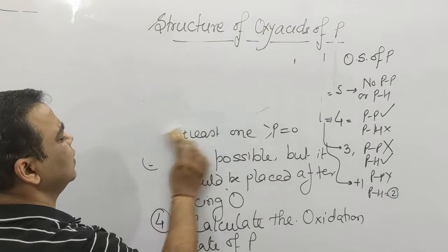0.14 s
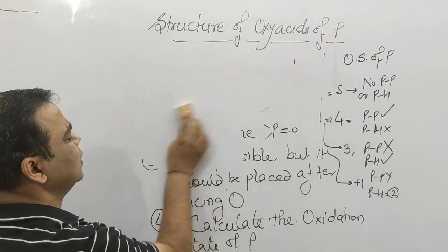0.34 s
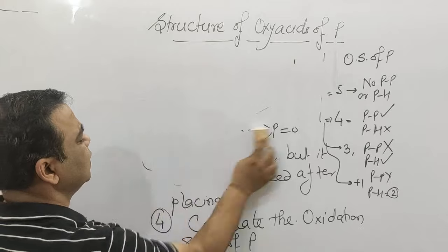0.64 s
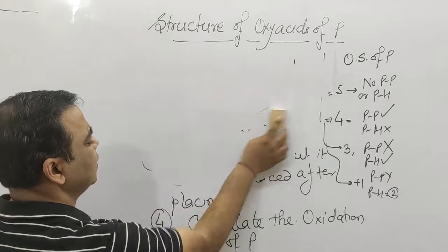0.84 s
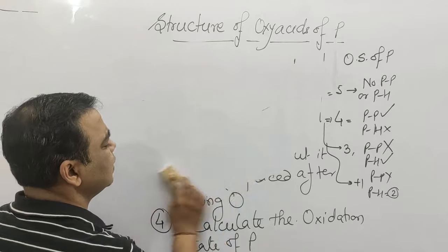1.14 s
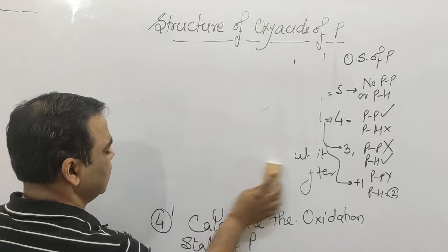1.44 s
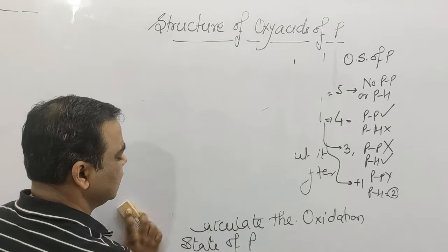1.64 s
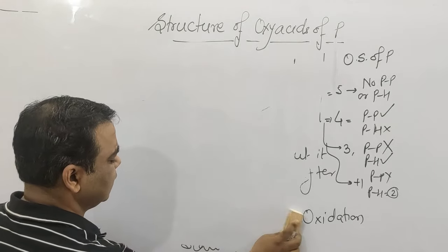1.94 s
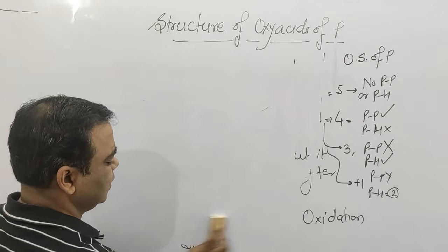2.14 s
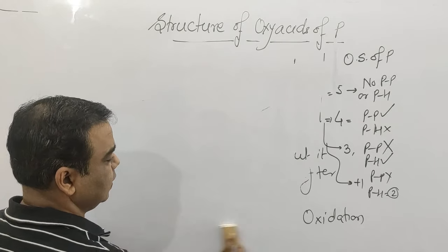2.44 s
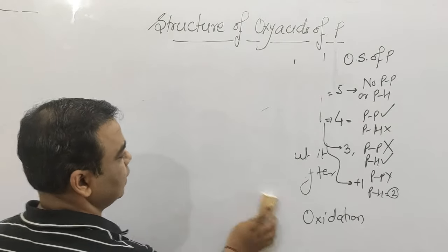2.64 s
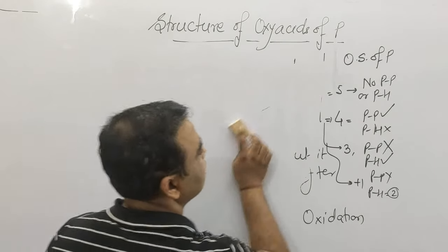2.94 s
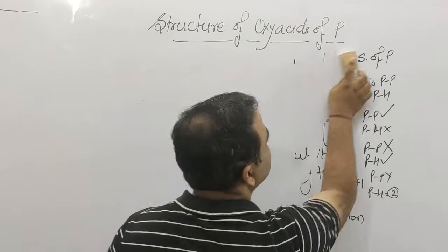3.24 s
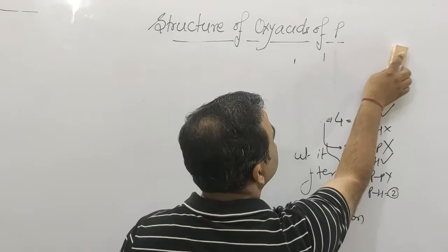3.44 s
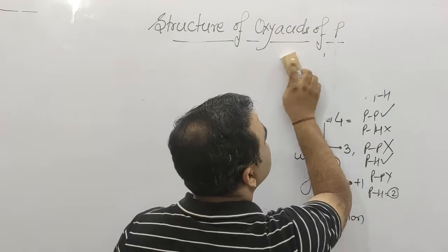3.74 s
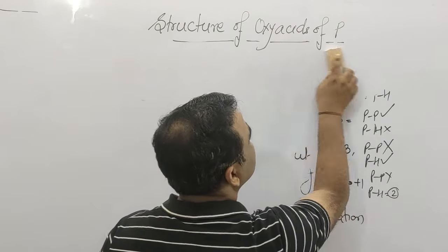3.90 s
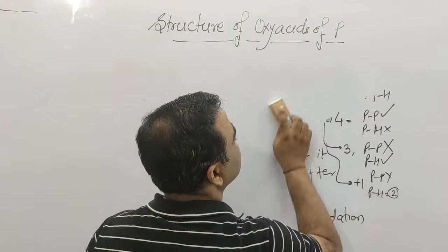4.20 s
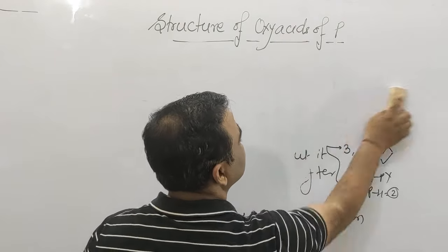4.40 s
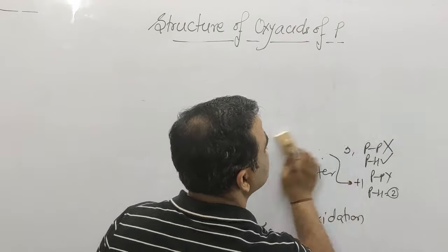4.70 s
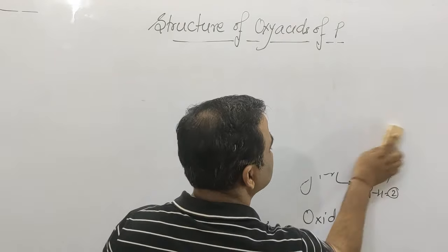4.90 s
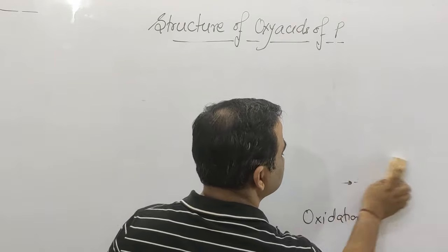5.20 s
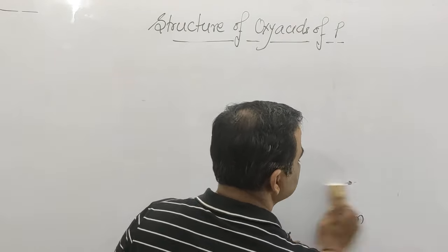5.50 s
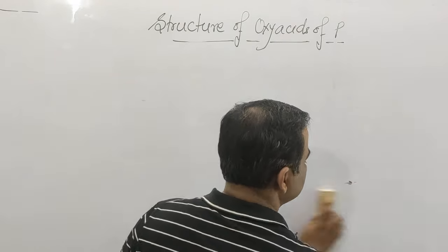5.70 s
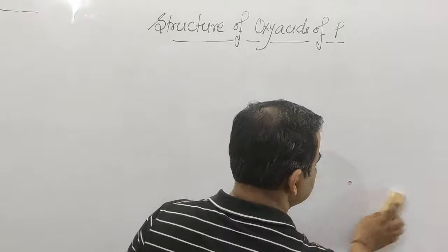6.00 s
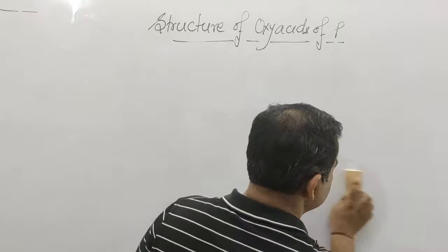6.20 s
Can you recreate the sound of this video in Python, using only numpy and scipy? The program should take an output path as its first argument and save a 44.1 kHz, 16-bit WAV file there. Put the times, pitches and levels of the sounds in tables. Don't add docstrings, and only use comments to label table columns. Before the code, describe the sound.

A felt duster swishes back and forth on a large whiteboard, the loose panel knocking hollowly and rumbling over a low fan hum.

```python
import sys
import numpy as np
from scipy import signal
from scipy.fft import rfft, irfft
from scipy.io import wavfile

SR = 44100
rng = np.random.default_rng(int(sys.argv[2]) if len(sys.argv) > 2 else 0)


def pcm_store(signal):
    levels = np.round(np.clip(np.atleast_2d(signal), -1, 1) * 32767)
    wavfile.write(sys.argv[1], SR, levels.astype(np.int16).T)


def invert_db(x):
    u = np.asarray(x, float) / 20
    return 10 ** u


N = 280035

# start in seconds, rap in dB, hollow ring in dB, crack against the rap in dB,
# hollow note in Hz.
KNOCKS = [(0.09, -41.5, -37.5, -5, 340), (0.2957, -26.5, -26.5, -25, 285), (0.438, -35, -35, -30, 287),
          (0.4963, -34.5, -30.5, -27, 280), (0.559, -35, -24.5, -31, 287.3), (0.602, -27, -40, -20, 245),
          (0.711, -24, -29, -21, 329), (1.169, -32, -26.5, -3.5, 295), (1.188, -36, -27, -20, 277.5),
          (1.2582, -23, -36, -16, 350), (1.757, -37, -26.5, -16, 281), (1.882, -41, -27, -18, 309),
          (1.935, -26.5, -28, -26, 294), (2.2002, -36, -36, -2.5, 283), (2.248, -23.5, -26, -6.5, 244),
          (2.291, -22, -24.5, -15.5, 237), (2.4285, -31, -24, -7.5, 274), (2.536, -25, -28, -16, 298),
          (2.855, -44.5, -50, -9, 228), (2.953, -44, -38.5, -11, 256), (3.159, -45, -38.5, -3, 245),
          (4.776, -39, -58, -22, 291), (5.6246, -38, -32.5, -12, 342), (6.236, -47, -46, -6, 317),
          (1.1738, -45, -33, 0, 304), (2.2542, -30, -34, -3, 206), (2.574, -46, -33, -15, 340)]
# start in seconds, thump in dB,
# hollow ring in dB, hollow note in Hz.
BUMPS = [(0.16, -20, -35.5, 284), (1.171, -23.5, -34, 280), (0.69, -42, -43, 230), (1.14, -40, -35.5, 220),
         (1.388, -34, -43, 322), (1.453, -51, -37.5, 305), (4.307, -40, -39, 224), (4.599, -37.5, -39, 294),
         (4.54, -32.5, -45, 276), (5.469, -33, -35, 256), (5.928, -43, -39.5, 250), (6.263, -35, -41, 219),
         (1.712, -46, -30.5, 270), (4.974, -37, -33, 266), (5.176, -55, -35.5, 320),
         (5.349, -33, -34.5, 364), (5.712, -19.5, -33.5, 343), (5.991, -52, -39.5, 380),
         (6.072, -29, -36.5, 306), (5.635, -45, -28.5, 248), (5.11, -36, -38, 280), (5.745, -44, -38, 370),
         (1.49, -32.5, -48, 305), (2.32, -27, -30, 240), (2.7, -46, -33, 300), (1.275, -32, -31.5, 370),
         (1.3, -37, -34, 280), (.76, -35, -35.5, 370)]
# pitch in Hz, level in dB, t60 in seconds.
DULL_MODES = [(374, 1, 0.023), (545, 4.5, 0.016), (655, -3.5, 0.028), (820, -4, 0.024)]


def rms_one(x):
    return x / np.sqrt(np.mean(x ** 2) + 1e-20)


def in_time(rows):
    s, *columns = np.transpose(rows)
    return [np.interp(np.arange(N) / SR, s, c) for c in columns]


def band(x, low_hz, high_hz):
    edges_hz = [low_hz, min(high_hz, SR / 2.2)]
    return signal.sosfilt(signal.butter(2, edges_hz, "band", fs=SR, output="sos"), x)


def coloured(x, spectrum):
    hz, level_db = np.transpose(spectrum)
    log_hz = np.log(np.arange(1, N // 2 + 2) * SR / N)
    return rms_one(irfft(rfft(x) * invert_db(np.interp(log_hz, np.log(hz), level_db)), N))


def drift(rate):
    r = np.exp(-80 * np.pi * rate / SR)
    slow = signal.lfilter([1], [1, -2 * r, r * r], rng.standard_normal(N // 40 + 2002))[2000:]
    return np.interp(np.arange(N) / 40, np.arange(len(slow)), rms_one(slow))


def resonant_noise(hz, width_hz):
    r = np.exp(-np.pi * width_hz / SR)
    section = [1, 0, -1, 1, -2 * r * np.cos(2 * np.pi * hz / SR), r * r]
    return rms_one(signal.sosfilt([section, section], rng.standard_normal(N)))


def swell(s, length):
    return np.exp(-(2 * (np.arange(N) / SR - s) / length) ** 2)


def ring(force, hz, t60):
    r, w = invert_db(-60 / (t60 * SR)), 2 * np.pi * hz / SR
    return signal.lfilter([0, np.sin(w)], [1, -2 * r * np.cos(w), r * r], force + 1e-18)


def fan():
    # frequency in Hz, level in dB per Hz.
    air_colour = [(18, -37), (36, 5), (66, -14), (152, -12), (198, -41), (278, -25), (494, -24), (535, -23),
                  (1030, -39.5), (1270, -39), (1880, -53.5), (2930, -41), (15700, -104)]
    # pitch in Hz, level in dB.
    motor_lines = [(89.4, -46.5), (162.5, -47.5), (146, -55)]
    t = np.arange(N) / SR
    air = invert_db(-43.5) * coloured(rng.standard_normal(N), air_colour)
    motor = sum(invert_db(db + 1.5 + 0.6 * drift(0.56)) * np.sin(2 * np.pi * hz * t) for hz, db in motor_lines)
    blades = invert_db(-54.5) * resonant_noise(42.3, 2.05)
    return air + motor + blades


def stroke_shape():
    # turn in seconds, sink of the hiss at the turn in dB,
    # hiss in mid-stroke in dB, fine hiss against it in dB.
    strokes = [(-.05, -13, -58.5, -5.5), (.16, -0.5, -56.5, -9), (.24, 0.5, -51, -5),
               (.345, 9, -60.5, -4.5), (.6, -1.5, -56.5, -8.5), (.88, 3, -65, -0.5), (.99, 0.5, -57, -6),
               (1.149, 0.5, -54, -9), (1.46, 10, -59, -3.5), (1.767, -2.5, -53.5, -13),
               (2.1, 7.5, -61.5, -4), (2.399, -0.5, -57.5, -12), (2.72, 2, -63.5, -5),
               (2.89, 2.5, -56.5, -9), (3.12, -1.5, -60, -3.5), (3.51, 2.5, -61, -5.5),
               (3.86, 5, -61.5, -7.5), (4.09, 4.5, -62.5, -3.5), (4.34, 1.5, -56.5, -4.5),
               (4.56, 5, -56.5, -10), (4.79, 2.5, -56.5, -6), (4.98, 7, -58, -7.5), (5.18, -0.5, -52, -9),
               (5.355, 9, -55.5, -9), (5.54, 1, -52, -10.5), (5.715, 8.5, -55.5, -8.5),
               (5.89, 0.5, -55, -10), (6.075, 6.5, -55, -1.5), (6.28, -0.5, -59, -8), (6.45, 0, -59, -2)]
    t = np.arange(N) / SR
    turn, sink_db, full_db, fine_db = np.transpose(strokes)
    middle = (turn[1:] + turn[:-1]) / 2
    speed = np.abs(np.sin(np.pi * np.interp(t, turn, np.arange(len(turn)))))
    turn_sharpness = 0.82
    loss_db = np.interp(t, turn, sink_db) * (1 - speed) ** turn_sharpness
    return np.interp(t, middle, full_db[:-1]), np.interp(t, middle, fine_db[:-1]), loss_db


def felt():
    # frequency in Hz, level in dB per Hz.
    rub_colour = [(900, 18), (1500, 18), (3000, 14), (5600, 10), (8000, 7.5), (12000, 9), (14500, 10.5),
                  (15900, 23.5)]
    # time in seconds, a level in dB that stays silent here,
    # thinnest air of the hiss against the fine hiss in dB.
    tilt = [(0.0, -61, -10), (0.23, -62, -9), (0.3, -56, -9), (0.35, -63, -8), (0.72, -62, -7),
            (0.88, -69, -9), (1.06, -58, -13), (1.38, -58, -8), (1.47, -62, -2), (1.61, -70, -3),
            (2.88, -68, -43), (3.15, -62, 1), (4.08, -70, -7), (4.28, -63, -3), (6.1, -63, -5),
            (6.17, -55, -13), (6.3, -66, -19), (6.35, -55, -6)]
    full_db, fine_db, loss_db = stroke_shape()
    caught = rng.random(N) < 30000 / SR
    slips = invert_db(0.5 * rng.exponential(1, N)) * rng.standard_normal(N) * caught
    rub = rfft(coloured(slips, rub_colour) * invert_db(0.77 * drift(30.0)))

    octave = np.log2(np.arange(1, N // 2 + 2) * SR / N)
    steps = [1 / (1 + np.exp((np.log2(hz) - octave) * 7)) for hz in (700, 1900, 4300, 9000, 13000)]
    steps.append(0)
    woody_db = -61.5 + 0.89 * (full_db + 60 - loss_db)
    main_db = full_db - loss_db
    lower_db = main_db - 1.5
    fine_level_db = full_db + fine_db - 0.96 * loss_db
    air_db = fine_level_db + 0.63 * in_time(tilt)[1] + 8.0
    out = np.zeros(N)
    for above, beyond, db in zip(steps, steps[1:], [woody_db, lower_db, main_db, fine_level_db, air_db]):
        out += invert_db(db + 0.99 * drift(8.5)) * rms_one(irfft(rub * (above - beyond), N))
    return out


def panel():
    # time in seconds, sway in dB.
    lean = [(0.0, -24), (1.41, -26.5), (1.52, -26.5), (1.77, -19), (1.87, -34), (2.25, -25), (2.83, -32),
            (2.95, -17.5), (3.2, -32), (3.4, -21.5), (3.73, -34.5), (3.86, -26), (4.63, -28), (4.69, -21.5),
            (5.48, -15), (6.35, -20.5)]
    # time in seconds, rumble in dB.
    pressure = [(0.0, -17), (0.05, -33), (0.87, -27), (1.02, -39.5), (1.29, -22.5), (1.45, -39),
                (1.5, -31.5), (2.16, -30), (2.35, -22.5), (2.41, -31), (3.22, -37.5), (3.73, -32.5),
                (3.82, -37), (4.47, -33.5), (4.56, -30), (5.25, -26.5), (5.85, -30), (6.35, -33)]
    # pitch in Hz, level in dB, t60 in seconds.
    hollow_modes = [(245, 2, 0.39), (284, 4, 0.24), (326, -1.5, 0.32), (356.5, -1, 0.24),
                    (504, -1.5, 0.052)]
    (sway_db,), (rumble_db,) = in_time(lean), in_time(pressure)
    white = rng.standard_normal((3, N))

    sway = rms_one(band(band(white[0], 2.45, 13.9), 2.17, 30.4))
    sway = rms_one(np.tanh(0.67 * sway))

    rumble = rms_one(band(band(white[1], 29.8, 50.7), 23.4, 62.3))
    rumble = rumble + invert_db(-8.5) * resonant_noise(42.45, 6.8)
    shudder = invert_db(-43.5 + 0.63 * (rumble_db + 27.5)) * band(white[1], 53.0, 170.0) / 0.08

    grit = white[2] * invert_db(1.8 * drift(30.0))
    drone = sum(invert_db(db) * ring(grit, hz, 0.27 * t60) for hz, db, t60 in hollow_modes + DULL_MODES[2:3])
    drone_db = -45.5 + 0.46 * (rumble_db + 26.0)
    rumble = invert_db(rumble_db + 0.51 * drift(8.1)) * rumble
    return invert_db(sway_db) * sway + shudder + rumble + invert_db(drone_db) * rms_one(drone)


def struck_points():
    rows = []
    for s, rap, hollow, crack, hz in KNOCKS:
        thump = -29.5 + 0.91 * (rap + 33)
        rows.append((s, rap, hollow, rap + crack, thump, hz))
    for s, thump, hollow, hz in BUMPS:
        rap = hollow - 22.5
        rows.append((s, rap, hollow, rap - 6, thump, hz))
    s, *columns = np.transpose(rows)
    return (s * SR).astype(int), *columns


def colour(column):
    # dull body in dB,
    # noisy wash in dB, deep thud in dB.
    knock_colours = [(-1, 0, 2), (-2, -2, -1), (0, 0, 6), (4, -2, 0), (-0.5, 0.5, 4), (4.5, 0.5, -1),
                     (-2, -1, 1.5), (1, 0.5, 6), (5, -8, -13), (5, -2.5, -1), (0, -1, 7), (3.5, 0, 0),
                     (2, -3.5, 2.5), (5, 3, 7.5), (3, 3, 3.5), (0, 2, 5), (-0.5, 0, 2), (1.5, 0, 2),
                     (-12, -7, -4), (-2, 7.5, -5), (2.5, 3.5, 2), (-3, -11, 0), (3, -13, -13), (0, 4, -2),
                     (8, -3, 2), (0, -12, 12.5), (-3, 3, 2)]
    return np.append(np.array(knock_colours)[:, column], np.zeros(len(BUMPS)))


def box_levels():
    _, rap_db, hollow_db, *_ = struck_points()
    box_db = -3 + hollow_db + 0.47 * (rap_db - hollow_db)
    box_db[len(KNOCKS):] = hollow_db[len(KNOCKS):] - 5.5
    return box_db + colour(column=0)


def knocks():
    # pitch in Hz, level in dB, t60 in seconds.
    rap_modes = [(863, -2, 0.02), (945, -2, 0.036), (1144, -5.5, 0.025), (1212, -3, 0.017),
                 (1360, -3.5, 0.02), (1430, -10, 0.03), (1680, -15, 0.036)]
    crack_modes = [(2250, 4.5, 0.0041), (2600, -3, 0.0064), (3460, -6.5, 0.011), (4180, -7, 0.013),
                   (4400, -1, 0.0036), (5600, -10, 0.0043), (6540, -30, 0.0044)]
    thump_modes = [(42.5, -2.5, 0.17), (67.4, 2, 0.05), (84.3, 2, 0.13), (118, -5, 0.099),
                   (173.6, -1.5, 0.1)]
    rap_lean = [0, 0, 5, -6, -12, 3, 4, -8, 6, 0, 6, 0, -3, -9, 14, -2, 1, -6, 10, 0, 4, -7, 9, 0, 3, 8, 0]
    start, rap_db, hollow_db, crack_db, thump_db, _ = struck_points()
    thump_db = thump_db + colour(column=2)
    lean = np.append(rap_lean, np.zeros(len(BUMPS)))
    after = np.arange(1200) / SR
    at = np.minimum(start[:, None] + np.arange(1200), N - 1)

    contact_s = 0.008 * invert_db(-np.clip(hollow_db - rap_db - 3.0, 0, 20))[:, None]
    rattle = np.exp(-after / contact_s) / np.sqrt(contact_s * SR)
    tick = (after == 0) * 0.75
    late = np.maximum(after - 0.00601, 0)
    push = late / 0.0018 * np.exp(-late / 0.0011) / 44

    families = [(rap_modes, rap_db, True), (DULL_MODES, box_levels(), True),
                (crack_modes, crack_db + 8.0, True), (thump_modes, thump_db + 0.5, False)]
    out = np.zeros(N)
    for modes, family_db, rough in families:
        for k, (hz, level_db, t60) in enumerate(modes):
            contact = push
            if rough:
                contact = 0.35 * rattle * rng.choice([-1, 1], at.shape) + tick * (-1) ** k
            db = family_db + level_db + rng.normal(0, 1.2, len(start))
            if modes is rap_modes:
                db = db + lean * np.log2(hz / 1150)
            force = np.zeros(N)
            np.add.at(force, at, contact * invert_db(db)[:, None])
            out += ring(force, hz, t60)
    return out


def hollow_rings():
    start, _, hollow_db, _, _, hollow_hz = struck_points()
    out, after = np.zeros(N + 6000), np.arange(6000) / SR
    dying = 2.33 * invert_db(-60 * after / 0.057) + 0.37 * invert_db(-60 * after / 0.27)
    dying = dying * (1 - np.exp(-after / 0.0063))
    for i, db, hz in zip(start, hollow_db - 2.5, hollow_hz):
        out[i:i + 6000] += invert_db(db) * dying * np.sin(2 * np.pi * hz * after)
    return out[:N]


def wash():
    # low edge in Hz, high edge in Hz, level against its family in dB, t60 in seconds.
    buzz_bands = [(240, 360, -15, 0.75), (430, 707, -18.5, 0.43), (830, 1550, -19, 0.37),
                  (1800, 3200, -14.5, 0.24), (3500, 7400, -23.5, 0.34)]
    start, rap_db, hollow_db, crack_db, _, _ = struck_points()
    families = [hollow_db, box_levels(), rap_db, np.maximum(crack_db, rap_db - 24), crack_db]
    out = np.zeros(N)
    for (low_hz, high_hz, db, t60), family_db in zip(buzz_bands, families):
        power = np.zeros(N)
        np.add.at(power, start, invert_db(2 * (family_db + db + colour(column=1))))
        power = signal.lfilter([1], [1, -invert_db(-120 / (t60 * SR))], power + 1e-18)
        power = signal.lfilter([0.006], [1, -0.994], power)
        out += np.sqrt(power) * rms_one(band(rng.standard_normal(N), low_hz, high_hz))
    return out


def classroom(x):
    t, t60_s = np.arange(SR) / SR, 0.67
    white = irfft(np.exp(2j * np.pi * rng.random(SR // 2 + 1)), SR)
    dull = signal.sosfilt(signal.butter(1, 900, fs=SR, output="sos"), white)
    tail = dull * invert_db(-60 * t / t60_s) + (white - dull) * invert_db(-72 * t / t60_s)
    tail = tail * (1 - np.exp(-t / 0.019))
    return signal.fftconvolve(x, rms_one(tail) / np.sqrt(SR))[:N]


def duster_whistles():
    # middle in seconds, length in seconds, pitch in Hz, level in dB.
    whistles = [(.22, 0.42, 5400, -60.5), (1.175, 0.32, 5600, -56.5), (1.676, 0.13, 5500, -52.5),
                (1.95, 0.8, 5600, -61), (2.307, 0.13, 2680, -52), (2.326, 0.1, 4800, -52.5),
                (2.28, 0.077, 6600, -57), (2.457, 0.12, 4000, -55), (2.47, 0.11, 2390, -57.5),
                (2.649, .1, 7130, -64), (2.82, 0.1, 2300, -64), (2.8, .15, 3350, -66),
                (2.804, .2, 5330, -62), (2.972, 0.24, 6140, -60), (3.01, 0.053, 3300, -52),
                (3.034, 0.13, 3500, -58), (3.058, 0.2, 1500, -55.5), (3.3, 0.17, 5000, -81),
                (3.437, 0.14, 2600, -61), (3.706, 0.11, 4400, -78), (0.26, 0.18, 3270, -60),
                (.67, 0.22, 5800, -61), (1.682, 0.083, 1590, -55), (1.698, 0.093, 2980, -59),
                (4.444, 0.14, 1520, -60), (4.924, .12, 3860, -60), (5.12, 0.055, 1000, -63),
                (5.835, .08, 1780, -57), (5.61, 0.11, 2450, -62), (3.967, 0.11, 4170, -68),
                (4.405, 0.25, 2600, -59), (4.408, 0.11, 5100, -56.5), (4.628, 0.2, 2560, -55),
                (4.622, 0.14, 4700, -55.5), (4.64, 0.17, 11000, -59.5), (4.73, 0.099, 1510, -60),
                (5.116, 0.066, 4560, -51.5), (5.12, 0.07, 2900, -62), (5.497, 0.064, 5400, -49),
                (5.6, 0.087, 2990, -63), (6.172, 0.1, 3620, -51), (6.181, 0.1, 5640, -50.5),
                (6.182, 0.14, 2430, -55)]
    scratchy = invert_db(1.3 * drift(38.0))
    out = np.zeros(N)
    for s, length, hz, db in whistles:
        width_hz = 0.26 * hz * (hz / 3000) ** 0.4
        out += invert_db(db) * swell(s, length) * scratchy * resonant_noise(hz, width_hz)
    return out


def snaps():
    # start in seconds, peak in dB.
    knock_clicks = [
        (1.169, -27),
        (2.247, -27),
        (6.237, -29),
    ]
    force = np.zeros(N)
    for s, db in knock_clicks:
        force[int(s * SR)] = -invert_db(db)
    return signal.lfilter([1], [1, -0.6], force)


def squeaks():
    # middle in seconds, length in seconds, pitch in Hz, level in dB.
    felt_squeaks = [
        (2, 0.08, 2330, -52),
        (3.18, 0.41, 1400, -63.5),
        (3.445, .04, 1800, -56.5),
        (3.045, .12, 3540, -57),
        (4.87, .06, 1500, -58),
        (5.133, 0.034, 2050, -49),
        (5.49, 0.058, 2000, -51),
        (5.85, .04, 1700, -60),
        (4.3, .12, 2360, -58),
        (5.24, .08, 2200, -61),
    ]
    return sum(invert_db(db) * swell(s, length) * resonant_noise(hz, 0.09 * hz)
               for s, length, hz, db in felt_squeaks)


def scene():
    struck, hollow = knocks() + snaps(), hollow_rings()
    echoes = invert_db(-8) * classroom(struck + invert_db(-9.0) * hollow)
    board = struck + hollow + wash() + echoes + panel()
    duster = felt() + duster_whistles() + squeaks()
    return (fan() + duster + board)[None]


def top_cut(x):
    return signal.sosfilt(signal.butter(12, 15820, fs=SR, output="sos"), x)


def record(dry):
    cut = signal.sosfilt(signal.cheby2(12, 70, 16300, fs=SR, output="sos"), dry)
    return top_cut(cut)


dry = scene()
out = record(dry)
pcm_store(out)
```